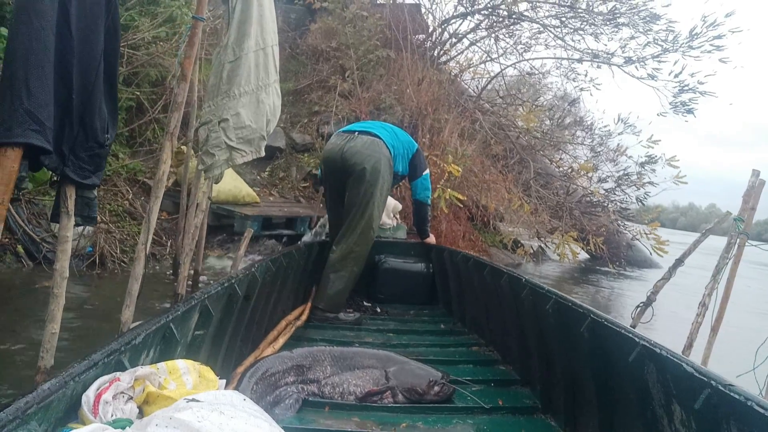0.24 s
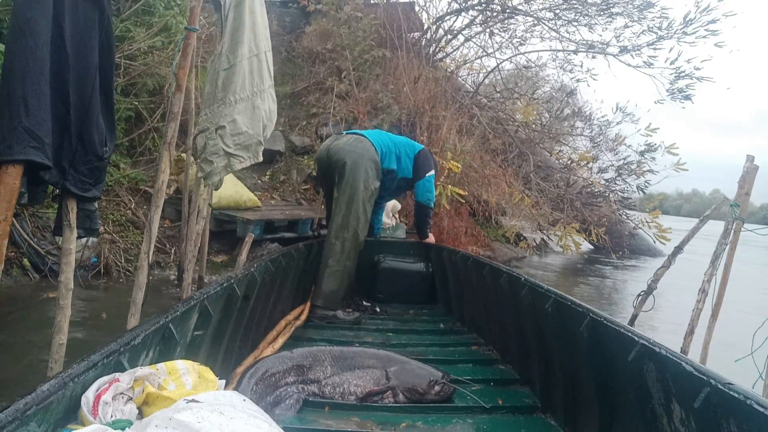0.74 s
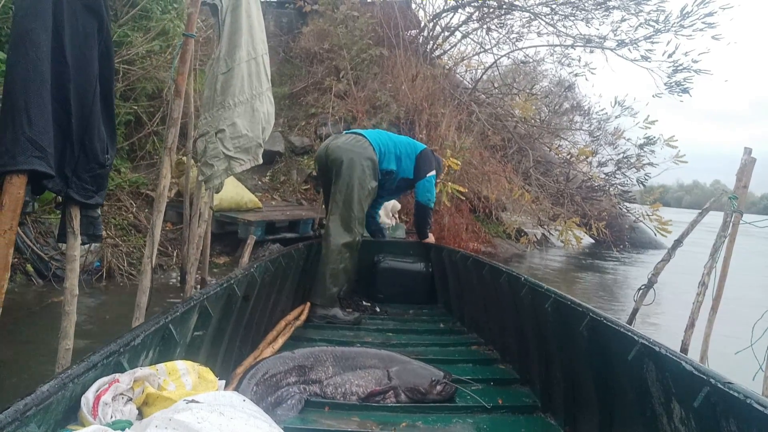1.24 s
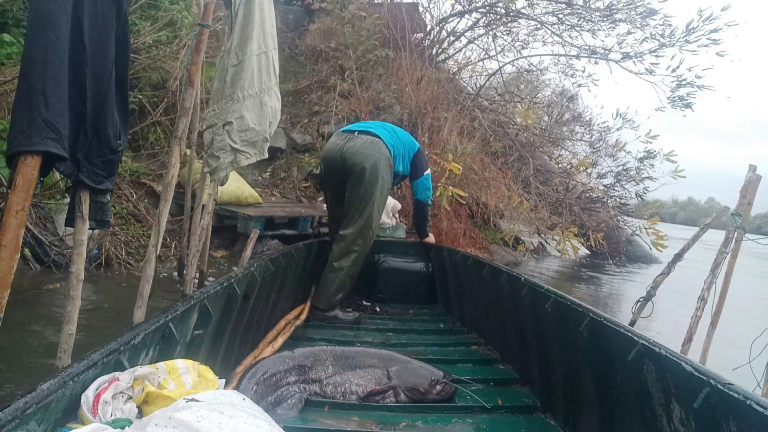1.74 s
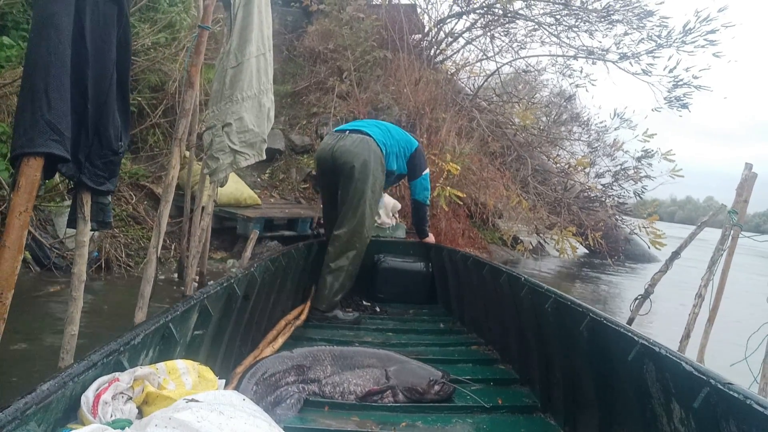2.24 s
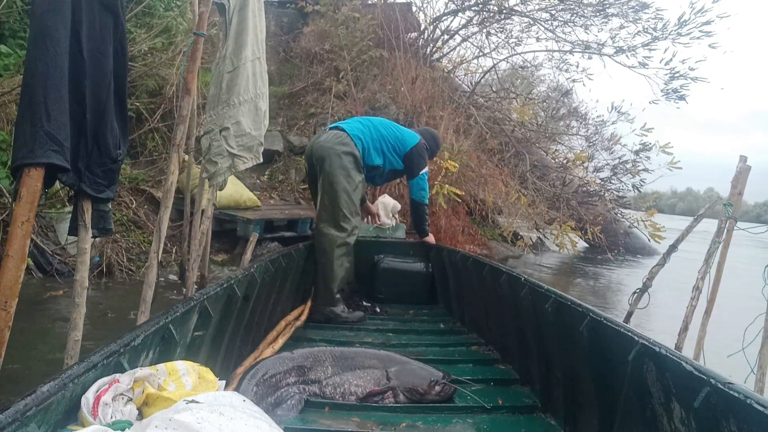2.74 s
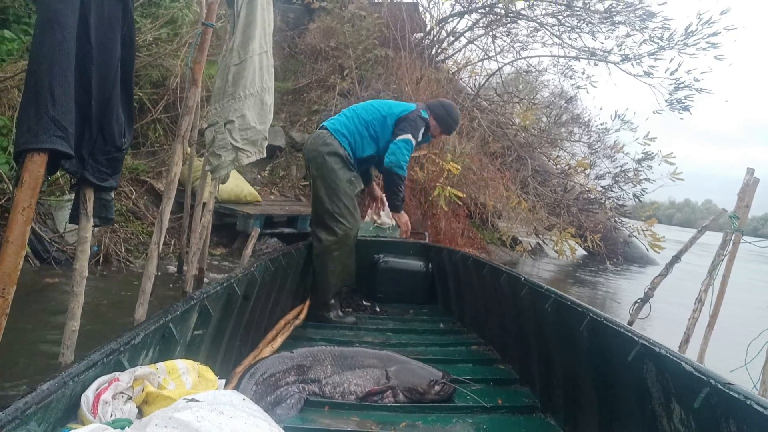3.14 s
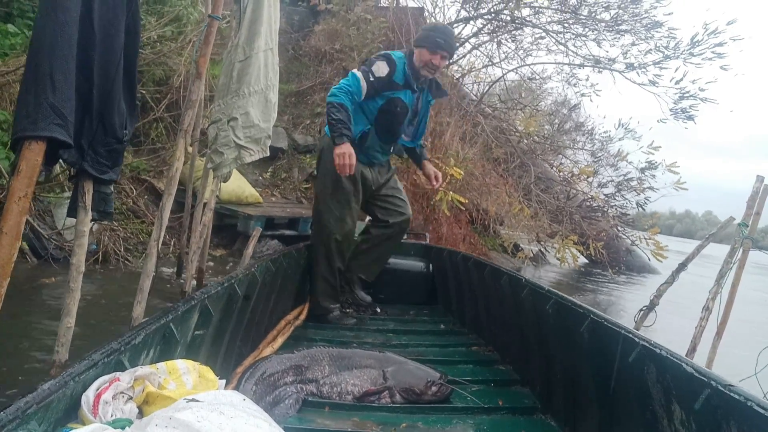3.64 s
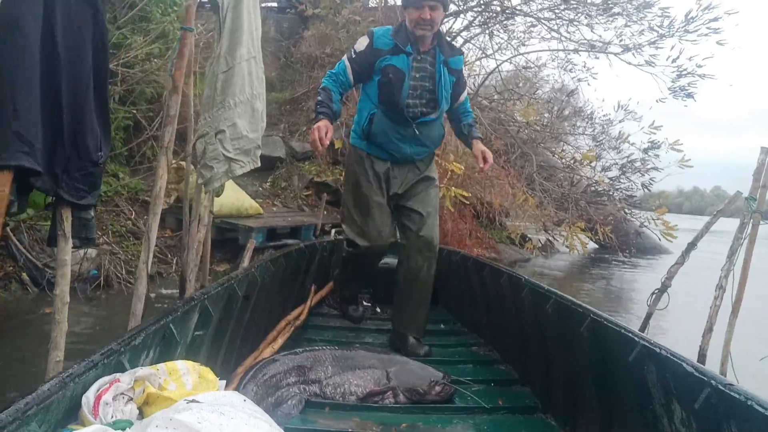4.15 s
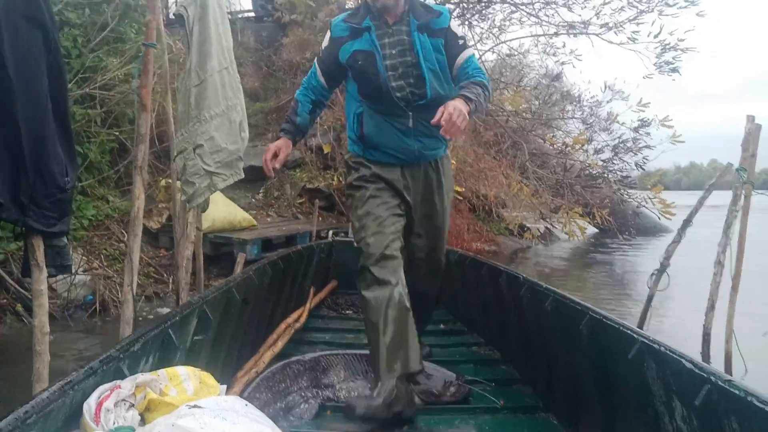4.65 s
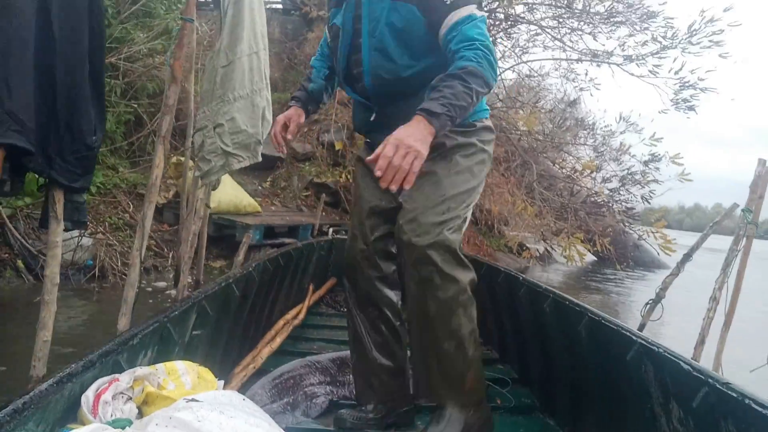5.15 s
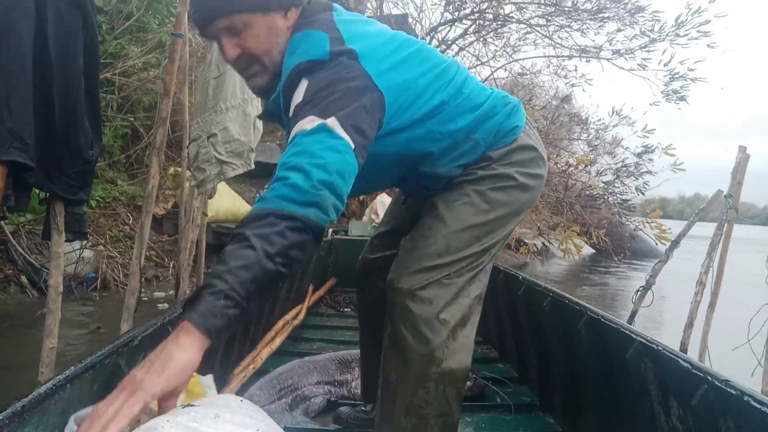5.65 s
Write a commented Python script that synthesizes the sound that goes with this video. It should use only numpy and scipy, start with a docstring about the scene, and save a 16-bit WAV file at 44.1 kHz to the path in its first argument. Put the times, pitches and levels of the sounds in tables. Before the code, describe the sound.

Boots thud on a resonant boat hull amid plastic sack rustles, cloth swishes and scuffs, over a faint river hiss.

```python
"""The hollow hull of a small moored boat booms as a man in waders works in the bow, then walks aft.
Each contact rings the hull's modes and shakes its ribbed floor boards; a dragged boot sticks and slips.
He tosses two sacks onto the bank and at the end grabs a plastic sack: friction grains crackle and slide.
His clothes swish with his movement; boots and gear scuff, squeak, knock and thud, and a thin jingle rings.
Behind it lie shaped noise for the faint hiss of the river bank and low swells of stirred water."""
import sys
import numpy as np
from scipy import signal
from scipy.fft import rfft, irfft
from scipy.io import wavfile
from scipy.ndimage import uniform_filter1d

SR = 44100
rng = np.random.default_rng(int(sys.argv[2]) if len(sys.argv) > 2 else 0)


def log_audio(samples):
    """Write samples as a 16-bit WAV file to the path given in sys.argv[1]."""
    # one column per channel
    frames = np.atleast_2d(samples).T
    # limit to full scale, then quantise
    limited = np.clip(frames, -1, 1)
    pcm = np.round(limited * 32767).astype(np.int16)
    wavfile.write(sys.argv[1], SR, pcm)


N = 260190
TIME = np.arange(N) / SR


def from_db(db):
    """Decibels to gain."""
    return 10 ** (np.asarray(db) / 20)


def rms_one(x):
    """Scale to unit power."""
    return x / np.sqrt(np.mean(x ** 2) + 1e-20)


def at_hz(points, hz):
    """Read a table on a log-frequency axis."""
    known, values = np.transpose(points)
    return np.interp(np.log(np.maximum(hz, 1)), np.log(known), values)


def lowpass(x, hz, order=2):
    """Causal low-pass; the tiny offset avoids denormal numbers."""
    sections = signal.butter(order, min(hz, .45 * SR), fs=SR, output="sos")
    return signal.sosfilt(sections, x + 1e-18)


def colour(x, spectrum):
    """Give a steady texture a spectrum; rms 1."""
    gain = from_db(at_hz(spectrum, np.fft.rfftfreq(N, 1 / SR)))
    return rms_one(irfft(rfft(x) * gain, N))


def flutter(hz, depth_db):
    """A gain that wanders at random; the first second of filter settling is dropped."""
    wander = lowpass(rng.standard_normal(N + SR), hz)[SR:]
    return from_db(depth_db * rms_one(wander))


def grains(per_s, spread_db):
    """Random clicks of uneven size and either sign; rms 1."""
    sizes = from_db(spread_db * np.minimum(rng.exponential(1, N), 4))
    signs = rng.choice([-1, 1], N)
    return rms_one(sizes * signs * (rng.random(N) < per_s / SR))


def friction(per_s, spread_db, patchy_db):
    """Random grains whose half-octave bands swell and fade each in its own way; rms 1."""
    spectrum, out = rfft(grains(per_s, spread_db)), np.zeros(N)
    # everything below 300 Hz shares the lowest band
    band = np.floor(2 * np.log2(np.maximum(np.fft.rfftfreq(N, 1 / SR), 300)))
    knots_s = np.arange(0, N / SR + 1, .018)
    for k in np.unique(band):
        swell = np.interp(TIME, knots_s, from_db(patchy_db * rng.standard_normal(len(knots_s))))
        out += swell * irfft(spectrum * (band == k), N)
    return rms_one(out)


CHIRP_LOW_HZ, CHIRP_OCTAVES = 752, 3.4
CHIRP_SWELL_S = 0.0062  # time to the crest, and decay constant


def chirps(count):
    """Plastic and rubber catch as tiny tones that swell and die at random times and pitches; rms 1."""
    out, t = np.zeros(N), TIME[:SR // 15]
    for when, height, size in rng.random((count, 3)):
        hz = CHIRP_LOW_HZ * 2 ** (CHIRP_OCTAVES * height)
        swell = t * np.exp(-t / CHIRP_SWELL_S)
        add(out, when * TIME[-1], (.5 + size) * swell * np.sin(2 * np.pi * hz * t))
    return rms_one(out)


def ring(force, hz, t60):
    """A resonance: a unit click sets a sine of height 1 ringing, with t60 in seconds."""
    r = np.exp(-np.log(1000) / (t60 * SR))
    w = 2 * np.pi * hz / SR
    return signal.lfilter([0, np.sin(w)], [1, -2 * r * np.cos(w), r * r], force + 1e-18)


def dying(t60):
    """One second of exponential decay."""
    return np.exp(-np.log(1000) * TIME[:SR] / t60)


def stroke(s, rise_s, hold_s, release_db_per_s, sag_db_per_s=0):
    """An envelope: straight rise, a hold that may sag, exponential release."""
    past = TIME - s - rise_s
    sag_db = sag_db_per_s * np.clip(past, 0, hold_s)
    release_db = release_db_per_s * np.maximum(past - hold_s, 0)
    return np.clip((TIME - s) / rise_s, 0, 1) * from_db(-sag_db - release_db)


def add(track, s, sound):
    """Mix a sound in at a time in seconds."""
    at = max(round(s * SR), 0)
    track[at:at + len(sound)] += sound[:N - at]


# tone of river and bank: frequency_hz, relative_level_db
BANK_SPECTRUM = [(120, -17), (200, 4), (245, -8), (558, -11), (635, -13), (916, -20), (1650, -17.5),
                 (2290, -29), (2860, -21), (7140, -22), (10700, -43), (14300, -18.5), (16000, -21)]
# tone of the stirred water: frequency_hz, relative_level_db
WATER_SPECTRUM = [(25, -45), (50, -4.5), (85, 0.5), (130, 0), (200, -5), (330, -6), (500, -12.5),
                  (900, -65)]
# soft low rumbles, as of water stirred when the hull rocks: crest_s, level_db
WATER_SWELLS = [(3.4, -44), (4.25, -42), (5.85, -42.5)]
BANK_DB, CALM_WATER_DB = -53, -52.5
SWELL_WIDTH_S = 0.14  # standard deviation of the bell-shaped swell


def river_bank():
    """Steady far hiss, and fluttering low noise as water stirs softly against the rocking hull."""
    hiss = from_db(BANK_DB) * colour(rng.standard_normal(N), BANK_SPECTRUM)
    stir = colour(rng.standard_normal(N) * flutter(hz=9.8, depth_db=3), WATER_SPECTRUM)
    swells = sum(from_db(db) * np.exp(-.5 * ((TIME - s) / SWELL_WIDTH_S) ** 2) for s, db in WATER_SWELLS)
    return hiss + (from_db(CALM_WATER_DB) + swells) * stir


# how briskly the man moves, as cloth level before the clothes trim: time_s, level_db
BRISKNESS = [(0, -64.5), (0.7, -62), (0.96, -52.5), (1.5, -52), (1.72, -64), (2.7, -58.5), (3.35, -53.5),
             (3.75, -56), (4.5, -46.5), (5.1, -51), (5.9, -48)]


def movement():
    """The man's briskness as a gain."""
    return from_db(np.interp(TIME, *np.transpose(BRISKNESS)))


# tone of rubbing cloth, also used by the scuffs: frequency_hz, relative_level_db
CLOTH_SPECTRUM = [(290, -4), (500, -5), (613, -10), (678, -6.5), (773, -8), (893, -9.5), (1230, -14.5),
                  (1620, -12.5), (2360, -15.5), (5390, -13), (6330, -11.5), (10100, -24.5), (14000, -21.5),
                  (16000, -15.5)]
FOLDS_PER_S, FOLD_T60_S = 14, .03
FOLD_DB, CLOTH_CHIRP_DB = -13, -19  # against the steady rubbing
CLOTHES_TRIM_DB = 2.0


def clothes():
    """Fine friction grains follow the man's movement; now and then a fold flicks over."""
    rubbing = friction(per_s=7000, spread_db=1.5, patchy_db=3.0)
    rubbing = rubbing + from_db(CLOTH_CHIRP_DB) * chirps(count=150)
    flicks = signal.fftconvolve(np.abs(grains(FOLDS_PER_S, spread_db=5.5)), dying(FOLD_T60_S))[:N]
    folds = rms_one(flicks * rng.standard_normal(N))
    cloth = colour(rubbing + from_db(FOLD_DB) * folds, CLOTH_SPECTRUM)
    return from_db(CLOTHES_TRIM_DB) * movement() * cloth


# tossed sacks land and slide to rest:
# start_s, crackle_db, slide_s, fade_db_per_s, load_db, load_rise_s
SACK_TOSSES = [(0.122, -36.5, 0.34, 9, -37.5, 0.22), (2.146, -35.5, .24, 35.5, -36.5, 0.063)]
# tone of sacks on the bank: frequency_hz, relative_level_db
FAR_CRACKLE_SPECTRUM = [(710, -34), (1200, -2), (1630, -1), (2400, -5), (2830, -2.5), (4960, -1),
                        (5650, -5.5), (7100, 0), (9930, -16.5), (15000, -7), (16000, -15.5)]
# tone of the sack at arm's length: frequency_hz, relative_level_db
NEAR_CRACKLE_SPECTRUM = [(710, -32), (1200, -11), (1370, -33), (1810, -4), (2400, -7.5), (2620, -1.5),
                         (3740, -3), (7020, -1), (10400, -13.5), (14000, -2), (16000, -6.5)]
# dull tone of the load inside: frequency_hz, relative_level_db
LOAD_SPECTRUM = [(88, -48), (150, -5.5), (281, 5), (388, -1.5), (457, 5), (525, -3.5), (647, 6.5),
                 (752, -2.5), (845, 1.5), (1620, -4.5), (2400, -13.5), (3120, -20), (5280, -120)]
LANDING_S, STOP_DB_PER_S, LOAD_FADE_DB_PER_S = 0.014, 96, 66
# the second sack is swung before it flies: a thin crackle
SWING_S, SWING_RISE_S, SWING_HOLD_S, SWING_DB = 2.047, .003, 0.047, -47
# the sack at arm's length is gripped and let go
GRAB_S, GRAB_RISE_S, GRAB_HOLD_S, GRAB_RELEASE_DB_PER_S = 5.68, 0.078, 0.12, 168
GRAB_CRACKLE_DB, GRAB_LOAD_DB = -34, -40
CLICK_DB, SACK_CHIRP_DB = -6.5, -18  # against the dense crackle


def sacks():
    """Woven plastic crackles in dense clumps while the load inside slides with a duller rustle."""
    sliding, load = np.zeros(N), np.zeros(N)
    for s, crackle_db, slide_s, fade, load_db, load_rise_s in SACK_TOSSES:
        sliding += from_db(crackle_db) * stroke(s, LANDING_S, slide_s, STOP_DB_PER_S, fade)
        load += from_db(load_db) * stroke(s, load_rise_s, 0, LOAD_FADE_DB_PER_S)
    swing = from_db(SWING_DB) * stroke(SWING_S, SWING_RISE_S, SWING_HOLD_S, STOP_DB_PER_S)
    grab = stroke(GRAB_S, GRAB_RISE_S, GRAB_HOLD_S, GRAB_RELEASE_DB_PER_S)
    creases = friction(per_s=5000, spread_db=0, patchy_db=2.5)
    creases = creases + from_db(CLICK_DB) * grains(per_s=230, spread_db=1.5)
    creases = creases + from_db(SACK_CHIRP_DB) * chirps(count=300)
    far_crackle = sliding * colour(creases, FAR_CRACKLE_SPECTRUM)
    near_crackle = (from_db(GRAB_CRACKLE_DB) * grab + swing) * colour(creases, NEAR_CRACKLE_SPECTRUM)
    rustle = colour(friction(per_s=900, spread_db=0.0, patchy_db=4.0), LOAD_SPECTRUM)
    return far_crackle + near_crackle + (load + from_db(GRAB_LOAD_DB) * grab) * rustle


# slaps and scuffs of sacking, soles and cloth, levels before the trim:
# start_s, level_db, rise_s, t60_s, dulling_cutoff_hz
SCUFF_EVENTS = [(0.1225, -29.5, 0.00092, .03, 14000), (0.529, -28.5, 0.0055, .1, 7000),
                (0.992, -32, .004, 0.058, 9000), (1.315, -43, .01, .2, 9000),
                (1.46, -35, 0.011, .16, 10000), (2.112, -36.5, .015, .3, 14000),
                (2.1552, -22.5, 0.0004, 0.044, 14000), (2.759, -22.5, 0.0025, .13, 3200),
                (2.935, -39.5, 0.016, 0.35, 7000), (3.365, -38.5, 0.017, 0.73, 12000),
                (3.414, -26, 0.0048, 0.12, 12100), (3.472, -34, 0.0011, 0.047, 12100),
                (4.125, -41, 0.0073, 0.38, 12000), (4.415, -34.5, 0.0056, 0.1, 12000),
                (4.472, -28.5, .002, 0.5, 1000), (4.497, -30, 0.0022, 0.055, 14000),
                (4.529, -23, 0.0021, 0.042, 5000), (4.746, -34, .009, 0.15, 14000),
                (4.801, -29.5, 0.012, 0.31, 7000), (5.403, -39.5, 0.0019, 0.68, 11900)]
SCUFF_TRIM_DB = -1.5


def scuffs():
    """Short bursts of friction grains with a quick rise; broad, soft contacts are the duller ones."""
    out, texture = np.zeros(N), colour(grains(per_s=9000, spread_db=3.5), CLOTH_SPECTRUM)
    for s, db, rise_s, t60, dull_hz in SCUFF_EVENTS:
        rise = 1 - np.exp(-TIME[:SR] / rise_s)
        burst = np.roll(texture, -round(s * SR))[:SR] * rise * dying(t60)
        keep = np.exp(-2 * np.pi * dull_hz / SR)  # one-pole low-pass
        dulled = signal.lfilter([1 - keep], [1, -keep], burst)
        add(out, s, from_db(db + SCUFF_TRIM_DB) * dulled)
    return out


# small squeaks, knocks and thuds of boots, sacking and gear, levels before the trim:
# start_s, peak_db, pitch_hz, noise_t60_s
SMALL_NOTES = [(0.149, -37, 1650, 0.035), (0.284, -32.5, 454, 0.22), (0.536, -36, 1265, 0.12),
               (0.577, -39, 2900, 0.042), (0.914, -30.5, 305, 0.37), (2.058, -39, 3960, 0.03),
               (2.157, -24.5, 3700, 0.03), (2.212, -35, 780, 0.058), (2.217, -29.5, 1530, 0.045),
               (2.340, -34, 960, 0.058), (2.376, -35.5, 1160, 0.062), (2.767, -31.5, 1060, 0.082),
               (3.424, -36.5, 808, 0.16), (4.025, -38, 443, 0.084), (4.232, -31.5, 475, 0.096),
               (4.391, -33, 326, 0.11), (4.712, -41, 1640, 0.092), (4.825, -37.5, 6300, 0.054),
               (5.405, -36.5, 455, 0.27), (5.494, -41, 1700, 0.059)]
SMALL_NOTE_TRIM_DB = 2.5


def squeaks_and_knocks():
    """Brief dying noise sets one resonance ringing: high ones squeak, low ones knock or thud."""
    out = np.zeros(N)
    for s, db, hz, t60 in SMALL_NOTES:
        noise = rng.standard_normal(SR) * dying(t60)
        # the resonance itself dies three times faster than the noise
        note = ring(noise, hz, t60 / 3)
        add(out, s, from_db(db + SMALL_NOTE_TRIM_DB) * note / np.abs(note).max())
    return out


# single bumps of boots and loads, levels before the hull and board trims:
# start_s, force_db, contact_cutoff_hz, place_along_hull_0_to_1, rattle_db
SINGLE_BUMPS = [(0.29, -38, 350, 0.4, -43), (0.387, -30, 447, .30, -43), (0.766, -8.5, 190, .764, -26),
                (0.9049, -39, 500, 0.48, -40), (1.0995, -21, 410, 0.31, -48),
                (1.2217, -13.5, 284, .571, -28), (1.329, -20.5, 358, .106, -33),
                (1.4839, -20.5, 130, .623, -34), (1.6049, -26.5, 90, .007, -36),
                (2.1517, -15, 110, .236, -38), (2.2096, -14.5, 105, .22, -25.5),
                (2.952, -19.5, 740, 0.5, -31.5), (3.055, -22, 254, .29, -28),
                (4.0245, -29.5, 172, 0.92, -38), (4.222, -23, 388, 0.05, -38),
                (4.9349, -19, 185, 0.4, -26.5), (5.3472, -13, 69, .226, -19),
                (5.668, -12, 139, 0.05, -30.5), (5.789, -21, 90, 0.27, -21)]
# full steps, heel then sole; the sole's rattle is against its force:
# start_s, heel_db, heel_cutoff_hz, heel_place_0_to_1, roll_s, sole_db, sole_cutoff_hz,
# sole_place_0_to_1, settle_delay_s, settle_db, relative_rattle_db
FOOTSTEPS = [(2.763, -.5, 377, 0.127, .0307, -1, 300, 0.396, 0.1, -9.5, -19),
             (4.4725, -5.5, 298, 0.27, .0131, 3.5, 205, 0.17, .0713, -7.5, -13.5),
             (4.802, -15.5, 750, .28, .017, -0.5, 206, 0.1995, .0273, -8, -16),
             (5.406, -22.5, 690, 0.33, .0417, -0.5, 71.6, 0.054, 0.13, -7, -19)]
HEEL_RATTLE_DB = -12  # against the heel's force


def blows():
    """Every contact with the hull as a bump: a step is heel, sole, then the weight settling."""
    rows = list(SINGLE_BUMPS)
    for (s, heel_db, heel_hz, heel_place, roll_s, sole_db, sole_hz, sole_place,
         settle_s, settle_db, rattle_db) in FOOTSTEPS:
        sole_s = s + roll_s
        rows += [(s, heel_db, heel_hz, heel_place, heel_db + HEEL_RATTLE_DB),
                 (sole_s, sole_db, sole_hz, sole_place, sole_db + rattle_db),
                 (sole_s + settle_s, settle_db, sole_hz, sole_place, settle_db + rattle_db)]
    return rows


def contact(hz):
    """The force pulse of a rubber sole: the softer, the lower its cut-off and the longer it lasts."""
    return lowpass(signal.unit_impulse(SR // 10), hz)


# modes of the hull's panels, also used by the boot drag: frequency_hz, relative_level_db, t60_s
HULL_MODES = [(76.7, -24, 0.99), (85.4, -17.5, 0.32), (90, -13, 0.73), (110, -13.5, 0.84),
              (129.05, -9.5, 0.65), (143.3, -21.5, 1), (181, -9.5, 0.68), (187, -1.5, 0.34),
              (204, -17, 0.98), (217.5, -16.5, 0.59), (271.4, -10, 0.18), (248.8, -4.5, 0.29),
              (283.7, -6.5, 0.53), (295.4, -9.5, 0.31), (316.4, -11, 0.44), (343.5, -14.5, 0.34),
              (359.4, -10.5, 0.45), (410.7, -21, 0.48), (450, -32, 0.96), (460.4, -9.5, 0.1),
              (560, -16.5, 0.04), (589, -18, 0.18), (720, -20, 0.12), (752, -17.5, 0.17)]
HULL_TRIM_DB = -6.5


def hull_booms():
    """Each blow rings the hull's modes, each by its standing-wave shape at the place that is hit."""
    contacts = blows()
    pulses = [from_db(db) * contact(hz) for s, db, hz, place, rattle_db in contacts]
    out = np.zeros(N)
    for k, (hz, mode_db, t60) in enumerate(HULL_MODES):
        force = np.zeros(N)
        for (s, _, _, place, _), pulse in zip(contacts, pulses):
            add(force, s, pulse * np.cos(np.pi * k * place))
        out += from_db(mode_db) * ring(force, hz, t60)
    # the panels radiate little below their lowest mode
    radiation = signal.butter(4, 52, "high", fs=SR, output="sos")
    return from_db(HULL_TRIM_DB) * signal.sosfilt(radiation, out)


# dense ring of floor boards and loose gear: frequency_hz, relative_level_db
BOARD_SPECTRUM = [(40, -20), (70, -7), (120, 2), (300, 1), (450, -8), (700, -2.5), (1100, -8), (1700, 3),
                  (2500, -5.5), (5000, -2)]
# how long the boards ring, read at each octave's centre: frequency_hz, t60_s
BOARD_DECAY = [(60, 0.86), (250, 0.7), (500, 0.4), (1500, 0.16), (6000, 0.11)]
BOARD_TRIM_DB, BOARD_RISE_S = 8.5, 0.0018


def board_rattle():
    """Each blow also shakes the floor boards: countless close modes, the high ones dying first."""
    edges = 40 * 2. ** np.arange(9)  # octave edges in Hz
    lows = edges[:-1]
    hz, out = np.fft.rfftfreq(SR, 1 / SR), np.zeros(N)
    shape = rms_one(from_db(at_hz(BOARD_SPECTRUM, hz)) * (hz < edges[-1]))
    octaves = np.array([shape * (hz >= low) * (hz < 2 * low) for low in lows])
    decays = np.array([dying(at_hz(BOARD_DECAY, low * np.sqrt(2))) for low in lows])
    rise = 1 - np.exp(-TIME[:SR] / BOARD_RISE_S)
    for s, _, contact_hz, _, rattle_db in blows():
        noise = rfft(rng.standard_normal(SR))
        tail = np.sum(irfft(noise * octaves, SR) * decays, axis=0)
        add(out, s, from_db(rattle_db + BOARD_TRIM_DB) * lowpass(tail * rise, contact_hz))
    return out


# tone of grit under the sole: frequency_hz, relative_level_db
GRIT_SPECTRUM = [(240, -16), (400, 1), (589, -3.5), (753, -2), (1310, -15), (1650, -11), (2230, -31),
                 (3000, -23), (3900, -57), (6600, -120)]
# the leg leans in, holds and lets go
DRAG_S, DRAG_RISE_S, DRAG_HOLD_S, DRAG_RELEASE_DB_PER_S = 0.78, 0.32, 0.13, 59
SHUDDER_DB, GRIT_DB = -32.5, -44.5


def boot_drag(place=0.333):
    """The sole sticks and slips unevenly at one place on the ribs; the hull shudders and grit rasps."""
    effort = stroke(DRAG_S, DRAG_RISE_S, DRAG_HOLD_S, DRAG_RELEASE_DB_PER_S)
    slips = lowpass(grains(per_s=260, spread_db=2.5), hz=422)
    panels = np.zeros(N)
    for k, (hz, db, t60) in enumerate(HULL_MODES):
        # the modes ring shorter here than after a blow
        panels += np.cos(np.pi * k * place) * from_db(db) * ring(slips, hz, t60 * 0.59)
    # the steady pull of the leg keeps the shudder even
    power = np.abs(uniform_filter1d(panels ** 2, size=SR // 30))
    shudder = panels / np.sqrt(power + 1e-12)
    rasp = colour(friction(per_s=1000, spread_db=-0.5, patchy_db=3.5), GRIT_SPECTRUM)
    return effort * (from_db(SHUDDER_DB) * shudder + from_db(GRIT_DB) * rasp)


# touches of something tiny he carries, levels before the trim: start_s, level_db
JINGLE_TOUCHES = [(3.420, -27), (3.476, -22), (3.533, -37), (4.498, -21)]
# its very high modes: frequency_hz, relative_level_db, t60_s
TINY_MODES = [(14700, -14, .012), (15235, 4, .03), (15450, -8, .02), (15620, -7, .025)]
JINGLE_TRIM_DB = -32


def jingle():
    """Something tiny is touched a few times and shivers: dying noise drives very high modes."""
    touches = np.zeros(N)
    for s, db in JINGLE_TOUCHES:
        add(touches, s, from_db(db) * rng.standard_normal(SR) * dying(t60=0.069))
    shiver = sum(from_db(db) * ring(touches, hz, t60) for hz, db, t60 in TINY_MODES)
    return from_db(JINGLE_TRIM_DB) * shiver


def scene():
    """All sources at one microphone in the open air."""
    boat = hull_booms() + board_rattle() + boot_drag()
    handling = sacks() + clothes() + scuffs() + squeaks_and_knocks() + jingle()
    return (boat + handling + river_bank())[None]


def record(dry):
    """The microphone sheds the deep bass, rounds the highest peaks and cuts the top."""
    bass_cut = signal.butter(3, 40, "high", fs=SR, output="sos")
    thin = signal.sosfilt(bass_cut, dry)
    rounded = thin / (1 + (thin / .95) ** 6) ** (1 / 6)
    top_cut = signal.ellip(12, .2, 80, 15900, fs=SR, output="sos")
    return signal.sosfilt(top_cut, rounded)


dry = scene()
out = record(dry)
log_audio(out)
```